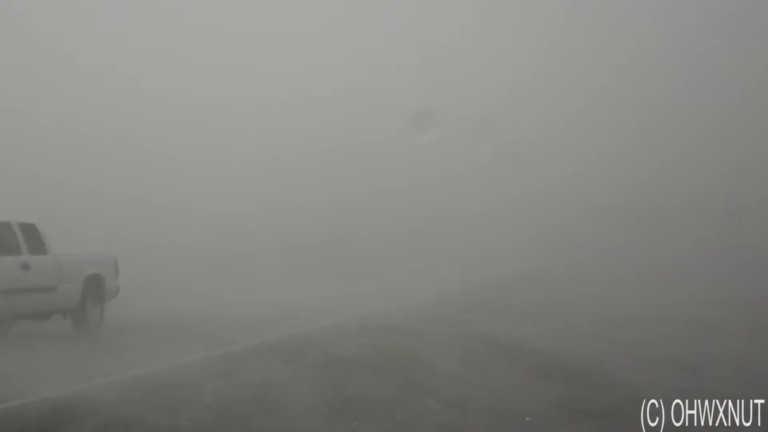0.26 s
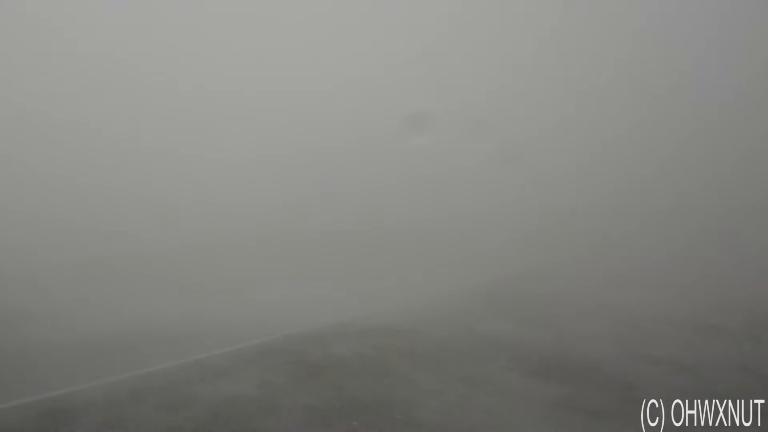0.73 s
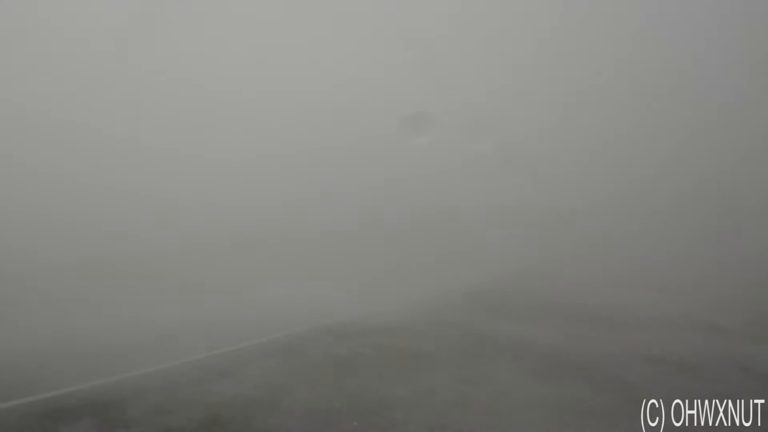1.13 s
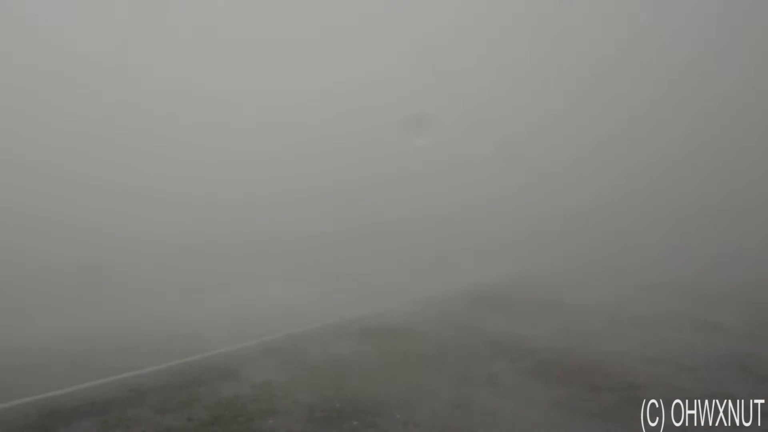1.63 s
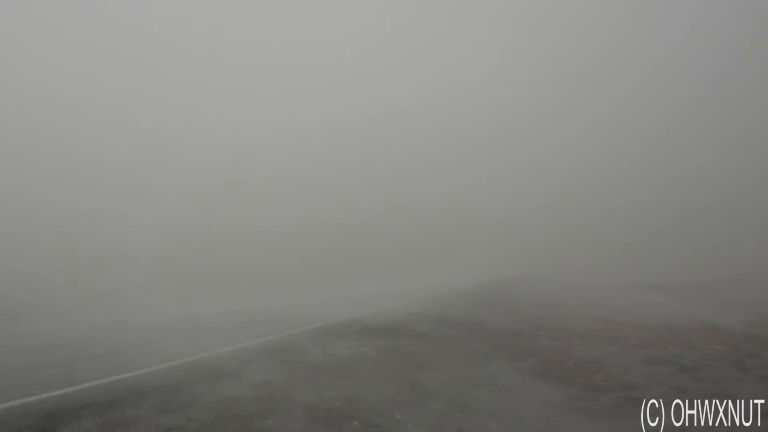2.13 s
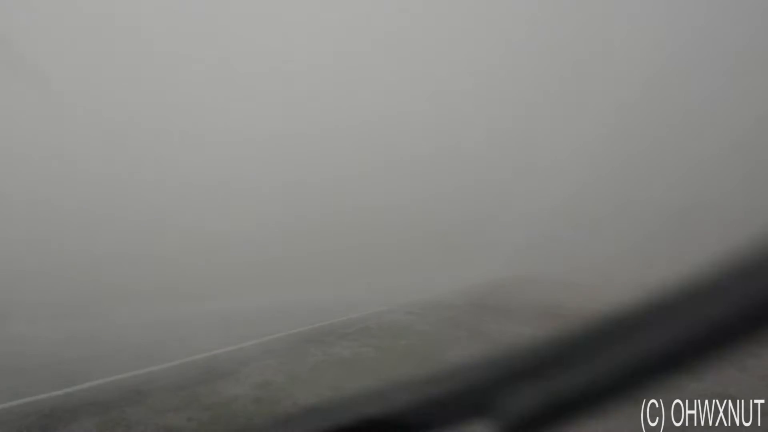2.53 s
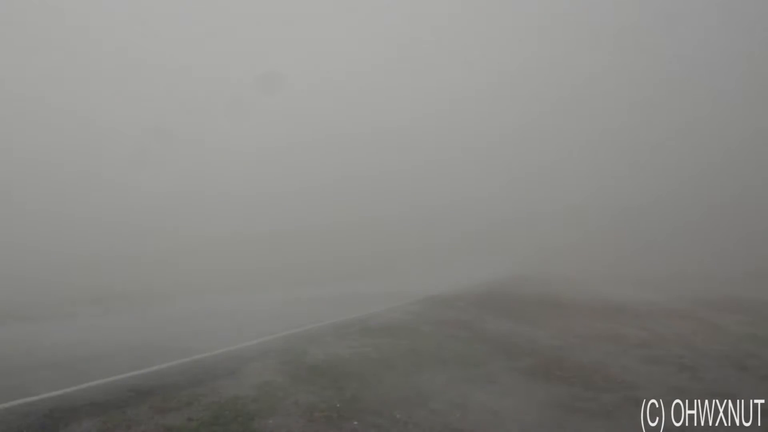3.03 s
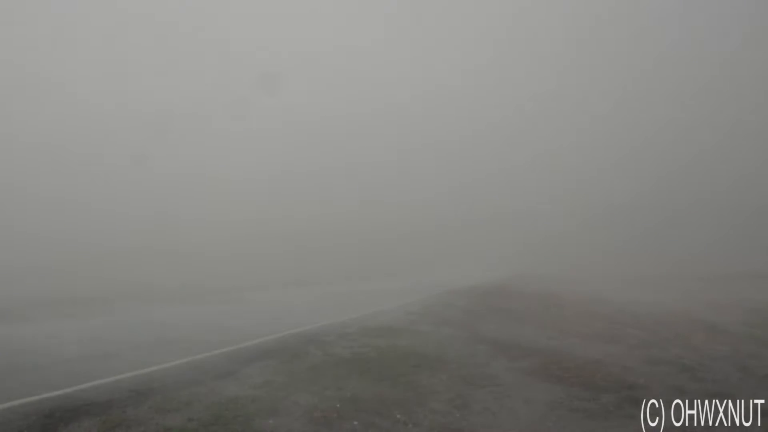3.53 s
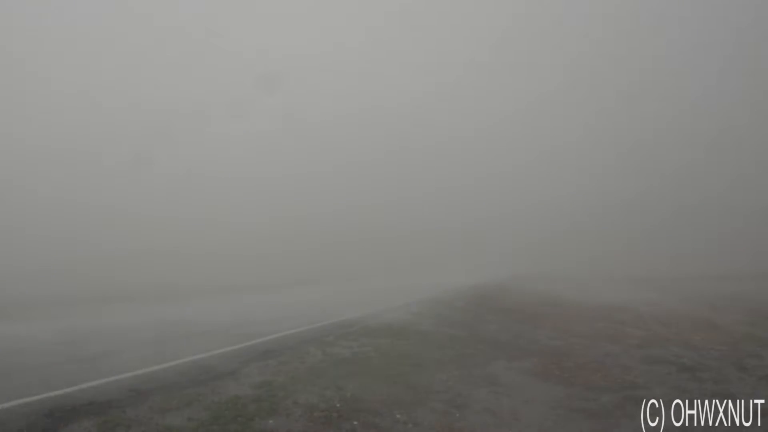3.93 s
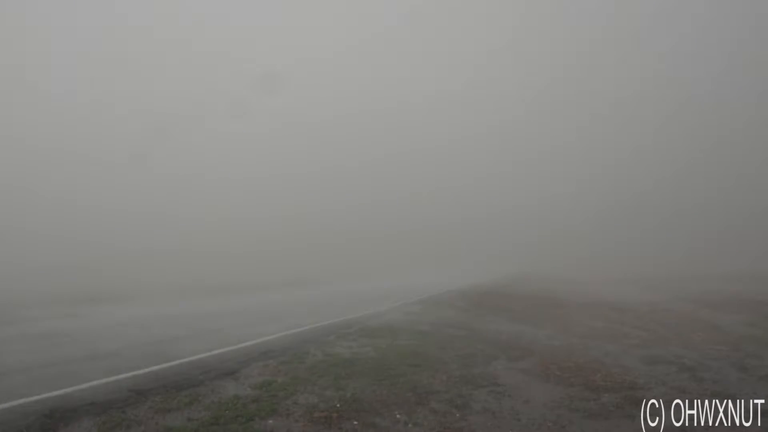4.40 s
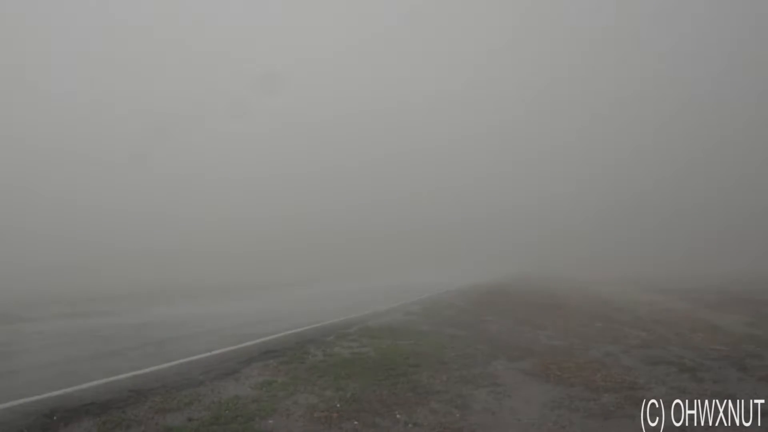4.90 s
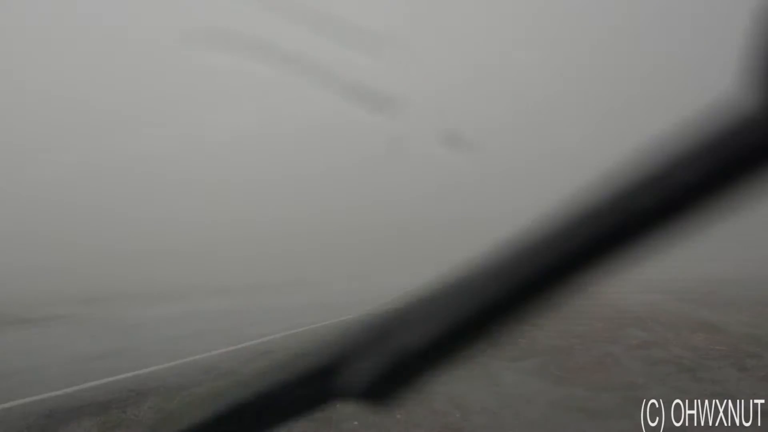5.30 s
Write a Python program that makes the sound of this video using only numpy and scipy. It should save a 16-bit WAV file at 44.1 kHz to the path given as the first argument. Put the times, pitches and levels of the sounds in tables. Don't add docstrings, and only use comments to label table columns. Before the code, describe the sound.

Heavy wind-driven rain batters a car in slapping sheets, swelling and thinning, while the idling engine booms low and wipers knock.

```python
import sys
import numpy as np
from scipy import signal
from scipy.fft import rfft, irfft, next_fast_len
from scipy.io import wavfile
from scipy.ndimage import uniform_filter1d, map_coordinates

SR = 44100
rng = np.random.default_rng(int(sys.argv[2]) if len(sys.argv) > 2 else 0)


def voltage_ratio(decibels):
    exponent = np.asarray(decibels, float) / 20
    return 10 ** exponent


def int16_out(signal):
    q = np.round(np.clip(np.atleast_2d(signal).T, -1, 1) * 32767)
    wavfile.write(sys.argv[1], SR, q.astype(np.int16))


N = 244755

# t/s, rain strength/dB, fineness of drops/dB, wind push on the body/dB, slant off the roof/dB
STORM = [(0, -0.5, -1, 1, 0.5), (.62, -2, 0, -2, 0), (.83, 4, 1, 2, 0.5), (1.05, 4.5, -0.5, 2, 1),
         (1.12, -2, -0.5, -0.5, 0.5), (1.6, 1.5, 2.5, 0, -0.5), (1.86, -3.5, 0, -0.5, -1),
         (1.98, 4, -0.5, -0.5, -0.5), (2.45, .5, 0.5, 0.5, 0.5), (2.86, -1, 0.5, 2, 0),
         (3.17, -8.5, -1.5, -1.5, 0), (3.54, -9, -4, -1.5, 2), (3.8, 0.5, 1.5, 0.5, 0.5),
         (4.01, 1.5, -1.5, -0.5, 2.5), (4.1, -7, -0.5, 1, 0), (4.94, -12.5, -4, -3, 0),
         (5.28, -3, 0, -1, 1), (5.55, -8, -1.5, -0.5, 0)]
# t/s, level over the storm/dB, fade/s, fineness/dB
SHEETS = [(.105, 3.5, 0.12, -0.5), (.11, 1.5, .02, 1.5), (.235, 1, 0.025, 2), (.39, 1.5, 0.038, -3),
          (.695, 3, 0.015, 1.5), (1.665, 2, 0.013, -4), (2.069, 4, 0.016, -1), (2.345, -1.5, 0.011, 3),
          (2.19, 2.5, .015, 1), (2.53, 4, 0.082, -0.5), (2.64, 2, 0.12, -1.5), (3.2, 1, 0.089, -1),
          (3.3, 3, 0.018, 4), (3.43, 3, 0.072, 1.5), (3.58, 6, 0.092, 3), (3.705, 5.5, 0.016, 0),
          (3.81, 2, 0.017, -1), (3.86, 2, 0.042, -1.5), (3.955, 3.5, 0.011, -0.5), (4.21, 4.5, 0.051, 3),
          (4.269, 5.5, 0.27, -0.5), (4.345, 1, .02, -2), (4.688, 6, 0.082, 1), (4.825, 4.5, 0.058, 4),
          (4.885, 5.5, 0.029, 1), (5.0, 2, 0.052, 0), (5.075, 3, 0.0087, 6), (5.295, 3, 0.011, 2),
          (5.362, 4, 0.0083, 1.5), (5.505, 5, 0.024, 2)]
# t/s, level/dB, half length/s
LULLS = [(1.463, 0, 0.017), (1.703, -0.5, .012), (1.794, -8, 0.012), (1.843, -5, 0.02), (2.14, -3, 0.0082),
         (2.211, -7, 0.0051), (3.404, -5, 0.026), (0.75, -2, 0.022), (1.926, -3.5, 0.012),
         (3.683, -2.5, .02), (5.38, -1.5, 0.012), (4.67, -4, 0.011), (5.477, -0.5, 0.015)]
# f/Hz, level per Hz/dB
WIND_ROCKING = [(15, -30), (35, 1), (70, 11), (130, 14), (200, 14), (300, -37)]
# t/s, level/dB
DRAUGHT = [(0, -50), (1.1, -50), (1.4, -71), (2.9, -56), (3.2, -45), (5.55, -46)]
# f/Hz, level per Hz/dB
HIGH_HISS = [(7000, -20), (10000, 2), (14000, -6), (15800, -2)]
# f/Hz, level per Hz/dB
DOOR_TONE = [(120, -10), (210, -3), (350, -4.5), (460, -2.5), (520, -7.5), (620, -9.5), (810, -40),
             (1360, -120)]
# f/Hz, level per Hz/dB
ROOF_TONE = [(350, -54), (600, -3.5), (726, 0), (956, -3), (1070, -2), (1390, -1.5), (2110, -9.5),
             (2600, -15), (3380, -51), (5720, -120)]
# f/Hz, level per Hz/dB
GLASS_TONE = [(1180, -24), (2000, -7.5), (2110, -12), (2640, -5.5), (3740, 1), (3990, -2.5), (4380, -0.5),
              (5390, -4.5), (8000, -16), (10400, -65), (17600, -120)]
# f/Hz, level per Hz/dB
SPRAY_TONE = [(4120, -11.5), (7000, -1.5), (9270, -0.5), (10600, -7), (11500, -8.5), (15000, -41),
              (22000, -120)]
# f/Hz, level per Hz/dB
MIST_TONE = [(9000, -39), (11000, -6), (12500, 0), (14000, -2.5), (15000, -6), (15800, -10)]
# f/Hz, width/Hz, level/dB
PANEL_RINGS = [(470, 60, 2), (730, 55, 2.5), (1075, 62, 3.5), (1394, 110, 2), (1680, 150, 2.5),
               (2440, 28, 4), (3748, 30, 5)]
# f/Hz, side over mid level/dB
STEREO_WIDTH = [(40, -20), (150, -31), (250, -17), (530, -17), (700, -12.5), (1400, -26), (1700, -15),
                (2600, -12), (3800, -52), (5300, -14), (7000, -3.5), (7750, 2), (9000, 2), (11500, -2),
                (14500, -14)]
# f/Hz, left minus right level/dB
LEFT_RIGHT = [(60, 0), (130, 1.5), (290, 0), (640, -0.5), (1410, -2.5), (3100, -2.5), (6820, -1.0),
              (15000, -3)]
# t/s, f/Hz, level/dB, fall by 60 dB/s
WIPER_RINGS = [(2.322, 226, -16.5, 0.2), (2.331, 133, -14, 0.11), (2.339, 453, -37, 0.035),
               (2.938, 257, -13.5, 0.082), (2.953, 634, -10, 0.052), (2.954, 845, -22, 0.058),
               (2.957, 129, -10, 0.065), (2.958, 1340, -23, 0.037), (5.028, 1376, -17, 0.044),
               (5.036, 463, -16, 0.054), (5.036, 704, -20, 0.045), (5.038, 131, -15, 0.23),
               (5.044, 233, -19, 0.11), (5.05, 70, -34, 0.17), (5.078, 2230, -33, 0.077)]
# t/s, level/dB, centre f/Hz
BLADE_SLAPS = [
    (2.33, -41, 298),
    (2.962, -27, 790),
    (5.041, -30.5, 700),
]
# t/s, firings per second/Hz
FIRING_RATE = [(0.0, 23.479), (0.4, 23.647), (0.79, 23.483), (1.19, 23.628), (1.59, 23.424), (1.98, 23.505),
               (2.38, 23.468), (2.78, 23.487), (3.17, 23.514), (3.57, 23.548), (3.96, 23.452),
               (4.36, 23.375), (4.76, 23.475), (5.15, 23.428), (5.55, 23.306)]
CYLINDER_LEVELS = [0, -4, -1.5, -4]
# f/Hz, level/dB
CABIN_BOOM = [(6, -70), (23.5, -19), (45, -36), (70, -21.5), (94, -17), (117, -7.3), (141, 0), (164, -.7),
              (188, -22), (230, -36), (400, -70)]
# f/Hz, width/Hz, level/dB, delay/s
LONG_BRANCH = (167, 28, -35, .0053)


def unit(x):
    return x / np.sqrt(np.mean(x ** 2) + 1e-20)


def along(points, hz):
    f, v = np.transpose(points)
    return np.interp(np.log(hz + 1), np.log(f + 1), v)


def curves(rows):
    s, *cols = np.transpose(rows)
    return [np.interp(np.arange(N) / SR, s, c) for c in cols]


def wobble(rate):
    knots = rng.standard_normal(int(N * 120 / SR) + 4)
    return map_coordinates(knots, [np.arange(N) * min(rate, 120) / SR])


def filtered(x, response):
    m = next_fast_len(N + SR // 2)
    return irfft(rfft(x, m) * response(np.fft.rfftfreq(m, 1 / SR)), m)[..., :N]


def causal(points, hz):
    cep = irfft(np.log(voltage_ratio(along(points, hz))))
    cep[1:len(hz) - 1] *= 2
    cep[len(hz):] = 0
    return np.exp(rfft(cep))


def white():
    return rng.standard_normal((2, N))


def drops(share, spread_db):
    landed = rng.random(N) < 1200 / SR
    sizes = voltage_ratio(spread_db * rng.random(N))
    hits = unit(landed * sizes * np.sign(white()))
    share = np.clip(share, 0, 1)
    return np.sqrt(1 - share) * white() + np.sqrt(share) * hits


def rush(source, spectrum, patchy_db):
    z = signal.stft(source, nperseg=512)[2]
    field = uniform_filter1d(rng.standard_normal(z.shape[1:]), size=6, axis=0)
    field = uniform_filter1d(field, size=10, axis=1)
    pair = signal.istft(z * voltage_ratio(patchy_db * unit(field)), nperseg=512)[1][:, :N]

    def colour(hz):
        rings = sum(db / (1 + (2 * (hz - c) / w) ** 2) for c, w, db in PANEL_RINGS)
        return voltage_ratio(along(spectrum, hz) + rings + [0 * hz, along(STEREO_WIDTH, hz)])

    pair = filtered(pair, colour)
    return pair / np.std(pair[0])


def high_hiss():
    return voltage_ratio(-71) * rush(white(), HIGH_HISS, patchy_db=0.4)


def wind():
    push_db = curves(STORM)[2]
    rock_db = -35 + 0.93 * push_db + 1.2 * wobble(2.95) + 0.43 * wobble(7.3)
    mid, side = voltage_ratio(rock_db) * rush(white(), WIND_ROCKING, patchy_db=1.0)
    puff_tone = [(44, -45), (58, 6), (90, 9), (200, -41.0)]  # f/Hz, level/dB
    puff = unit(filtered(rng.standard_normal(N), lambda hz: voltage_ratio(along(puff_tone, hz))))
    draught_db = curves(DRAUGHT)[0] + 2.3 * wobble(4.7)
    return np.array([mid, side + voltage_ratio(draught_db) * puff])


def storm():
    t = np.arange(0, N / SR + .001, .001)
    s, db, fade, fine = np.transpose(SHEETS)[:, :, None]
    length = np.where(t < s, 0.014, fade)
    power = np.where(t < s, 2, 2.5)
    shape = np.exp(-abs((t - s) / length) ** power)
    gaps_db = sum(dip_db * np.exp(-((t - at) / half) ** 2) for at, dip_db, half in LULLS)
    sheets_db = (db * shape).sum(axis=0) + gaps_db
    sift_db = (fine * shape).sum(axis=0)
    slap_db, sift_db = curves(np.transpose([t, sheets_db, sift_db]))
    strength_db, fine_db, *_ = curves(STORM)
    return strength_db + slap_db, fine_db + sift_db


def doors(drum_db, fine_db, flurry):
    level_db = -34 + 0.57 * drum_db - 0.88 * fine_db + curves(STORM)[2] + 0.6 * wobble(9)
    return voltage_ratio(level_db + 0.12 * flurry) * rush(drops(0.038, 16), DOOR_TONE, patchy_db=1.5)


def roof(drum_db, fine_db, flurry):
    level_db = -31 + 0.84 * drum_db - 0.48 * fine_db - curves(STORM)[3]
    return voltage_ratio(level_db + 0.45 * flurry) * rush(drops(0.06, 34), ROOF_TONE, patchy_db=1.0)


def glass(strength_db, flurry):
    level_db = -31.5 + strength_db + 1.46 * flurry
    return voltage_ratio(level_db) * rush(drops(0.038, 32), GLASS_TONE, patchy_db=0.05)


def spray(spray_db, flurry):
    level_db = -45.5 + spray_db + 0.74 * flurry + 0.74 * wobble(70)
    return voltage_ratio(level_db) * rush(drops(0.3, 21), SPRAY_TONE, patchy_db=0.8)


def mist(spray_db, flurry):
    level_db = -52.5 + 0.96 * spray_db + 1.5 * flurry + 1.4 * wobble(60)
    return voltage_ratio(level_db) * rush(drops(0.12, 12), MIST_TONE, patchy_db=0.5)


def rain():
    strength_db, fine_db = storm()
    drum_db = uniform_filter1d(strength_db, size=round(0.046 * SR))
    spray_db = 1.1 * strength_db + fine_db
    flurry = 0.1 * wobble(20) + 0.3 * wobble(45) + 0.88 * wobble(90)
    metal = doors(drum_db, fine_db, flurry) + roof(drum_db, fine_db, flurry)
    return metal + glass(strength_db, flurry) + spray(spray_db, flurry) + mist(spray_db, flurry)


def wiper_arm():
    out, t = np.zeros(N + SR), np.arange(SR // 2) / SR
    soft = (1 - np.exp(-t / .004)) ** 2
    for s, hz, db, t60 in WIPER_RINGS:
        ring = voltage_ratio(db - 60 * t / t60) * np.sin(2 * np.pi * hz * t)
        out[round(s * SR):][:len(t)] += soft * ring
    return out[:N]


def wiper_blade():
    t = np.arange(N) / SR
    out = np.zeros(N)
    for s, db, c in BLADE_SLAPS:
        band = lambda f: (1j * f * c / (c * c - f * f + 1j * f * c)) ** 4
        puff = unit(filtered(rng.standard_normal(N), band))
        out += voltage_ratio(db) * np.exp(-((t - s) / .009) ** 2) * puff
    return out


def engine():
    turns = np.cumsum(curves(FIRING_RATE)[0]) / SR
    count = np.arange(int(turns[-1]) + 1)
    luck = rng.standard_normal((len(count), 2))
    when = np.interp(count, turns, np.arange(N) / SR)
    when = when - .0093 + .0002 * luck[:, 0]
    lead = SR // 10
    place = np.round(when * SR).astype(int) + lead
    pulses = np.zeros(N + 2 * lead)
    pulses[place] = voltage_ratio(np.take(CYLINDER_LEVELS, count, mode="wrap") + 1.0 * luck[:, 1])
    back = lambda hz, s: np.exp(2j * np.pi * hz * s)
    boom = unit(filtered(pulses, lambda hz: causal(CABIN_BOOM, hz) * back(hz, lead / SR)))

    pulses[place[1::2]] *= -1
    c, w, db, lag = LONG_BRANCH
    ring = lambda f: (1j * f * w / (c * c - f * f + 1j * f * w)) ** 2 * back(f, lead / SR - lag)
    return voltage_ratio(-20.5) * boom + voltage_ratio(db) * unit(filtered(pulses, ring))


def scene():
    mid, side = high_hiss() + wind() + rain()
    mid = mid + wiper_arm() + wiper_blade() + engine()
    tilt = lambda hz: voltage_ratio(along(LEFT_RIGHT, hz) * [[.5], [-.5]])
    return filtered(np.array([mid + side, mid - side]), tilt)


def low_pass(x):
    return signal.sosfilt(signal.butter(12, 15750, fs=SR, output="sos"), x)


def record(dry):
    return low_pass(dry)


dry = scene()
out = record(dry)
int16_out(out)
```